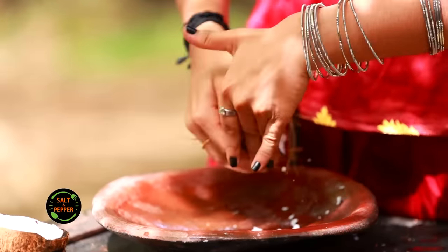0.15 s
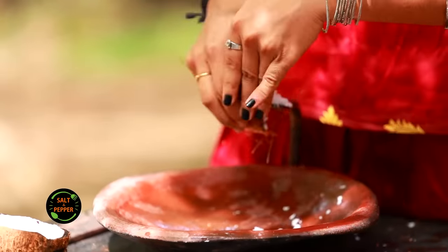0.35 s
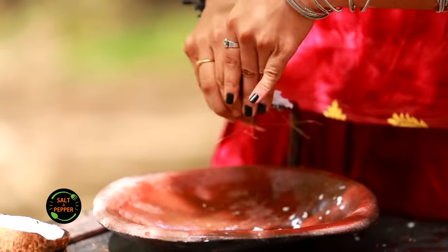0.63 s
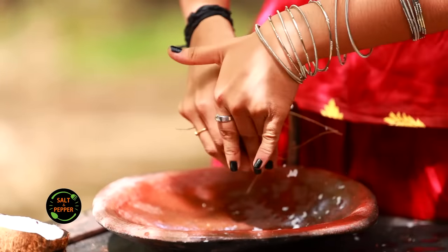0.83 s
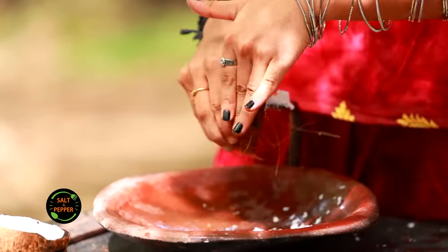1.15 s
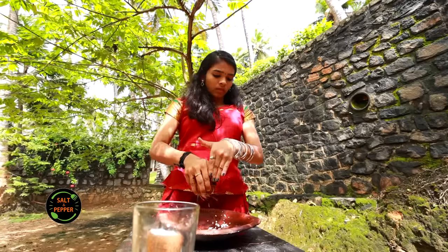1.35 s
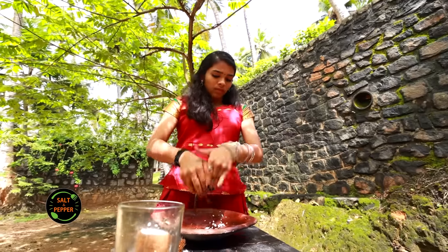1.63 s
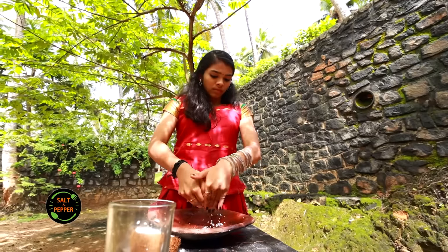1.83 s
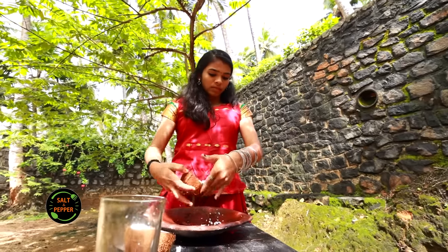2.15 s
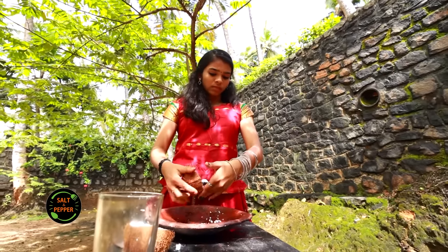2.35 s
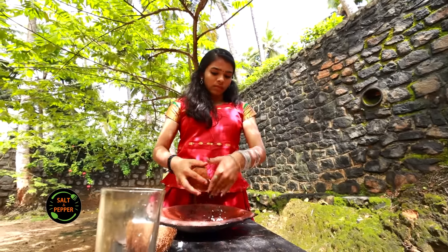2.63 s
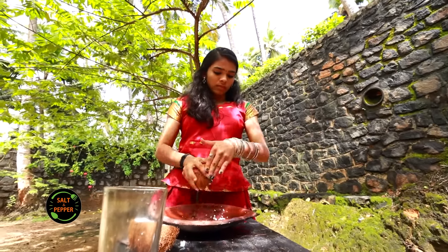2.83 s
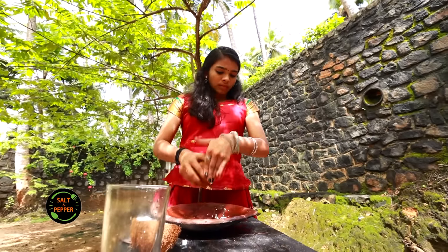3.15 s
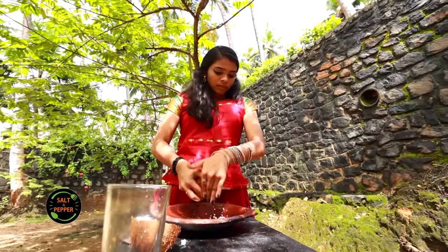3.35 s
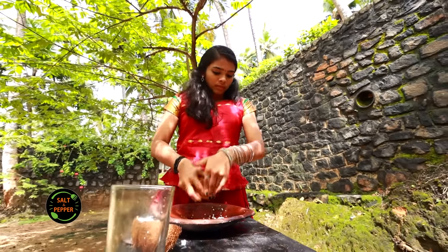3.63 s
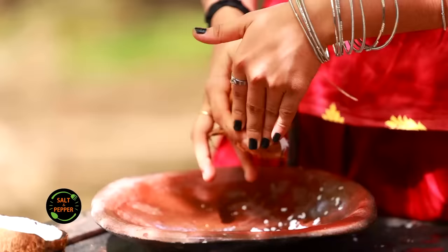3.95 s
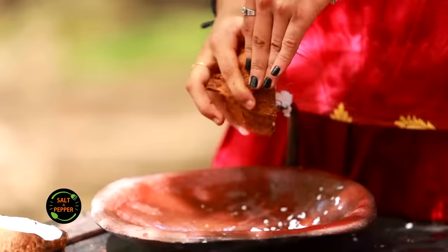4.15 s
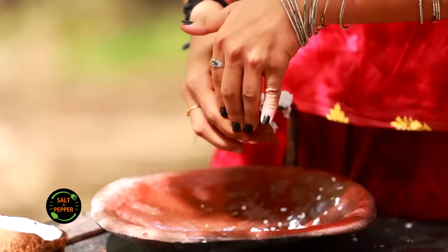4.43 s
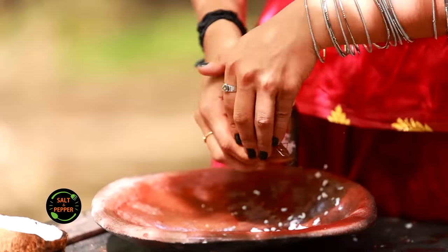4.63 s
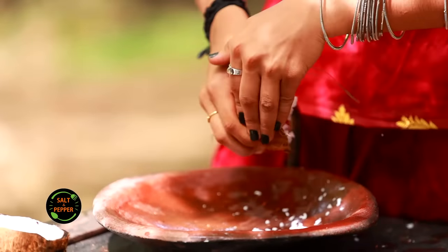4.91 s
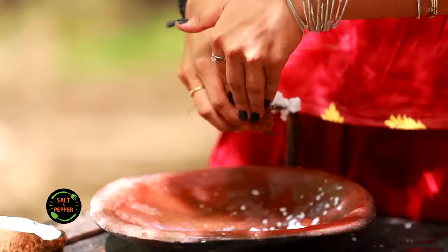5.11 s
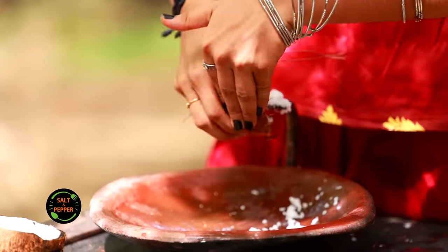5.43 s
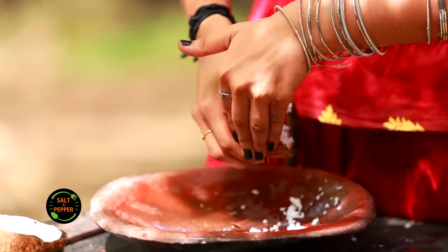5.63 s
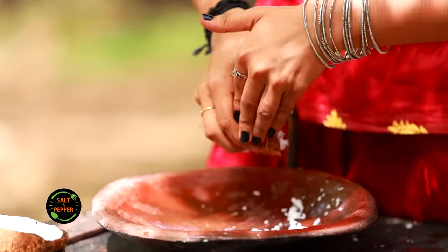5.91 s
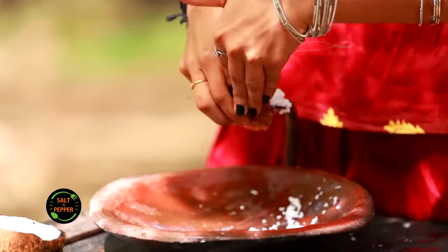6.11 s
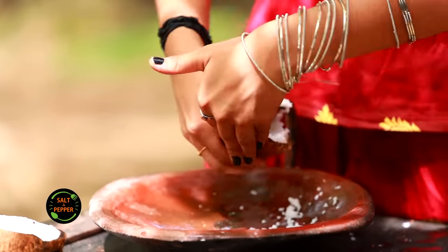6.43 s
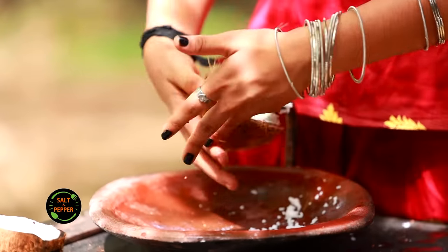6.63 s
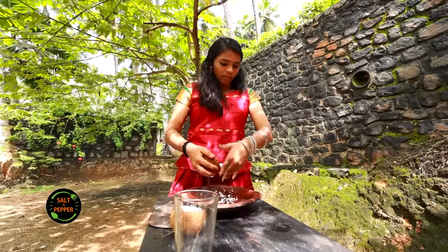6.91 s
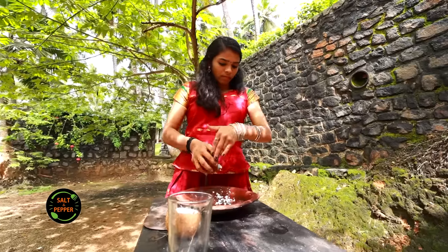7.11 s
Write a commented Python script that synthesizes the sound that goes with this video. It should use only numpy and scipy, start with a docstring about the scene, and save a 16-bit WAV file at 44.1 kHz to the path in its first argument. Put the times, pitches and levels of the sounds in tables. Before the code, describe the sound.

At an outdoor table near the microphone, a coconut half scrapes over a metal grater about three times a second, each stroke a short, hollow rasp. Thin bangles clink on the moving wrist and husk fibres crackle. The scraping stops briefly, resumes for a longer run with a brighter metallic edge, and ends with one knock of the shell. Behind it are a quiet low hum and, in the first half, a few faint distant whistles.

```python
"""Half a coconut is grated on a toothed blade at an outdoor table, over a low hum.
From the start, dry husk crackles under the fingers, thin metal bangles clink on the working wrist,
and faint whistles fade far off. Six strokes come about a third of a second apart: the teeth stick and
slip, which rasps the flesh, rings the hollow shell and thumps the table. After a pause of about a second
come ten more strokes. Near the end the shell is set down on the blade with a knock."""
import sys
import numpy as np
from scipy import signal
from scipy.fft import rfft, irfft
from scipy.io import wavfile

SR = 44100
rng = np.random.default_rng(int(sys.argv[2]) if len(sys.argv) > 2 else 0)


def file_out(sig):
    """Save sig as 16-bit WAV at sys.argv[1]."""
    # one column per channel
    cols = np.atleast_2d(sig).T
    # limit, then scale
    lim = np.clip(cols, -1, 1)
    pcm = np.round(lim * 32767).astype(np.int16)
    wavfile.write(sys.argv[1], SR, pcm)


N = 320166
TIME = np.arange(N) / SR
TOP_HZ = 15800


def undb(db):
    """Turn decibels into a gain."""
    return 10 ** (np.asarray(db) / 20)


def unit(x):
    """Scale a sound to an average (rms) level of 1."""
    return x / np.sqrt(np.mean(x ** 2) + 1e-18)


def curve(points, at=TIME):
    """Join (time_s, value) points with straight lines."""
    return np.interp(at, *np.transpose(points))


def add(out, start_s, x):
    """Mix x into out from start_s on."""
    i = max(int(start_s * SR), 0)
    out[i:i + len(x)] += x[:max(N - i, 0)]


def colour(x, points):
    """Shape the bass and treble with a curve through (pitch_hz, level_db) points."""
    hz, db = np.transpose(points)
    freqs = np.fft.rfftfreq(len(x), 1 / SR) + 1
    return irfft(rfft(x) * undb(np.interp(np.log(freqs), np.log(hz), db)), len(x))


def resonate(x, tones):
    """Let x ring (pitch_hz, width_hz, level_db) tones; neighbours swing opposite ways."""
    out = 0
    for k, (hz, width, db) in enumerate(tones):
        b, a = signal.iirpeak(min(hz, TOP_HZ), hz / min(width, TOP_HZ), fs=SR)
        out = out + (-1) ** k * undb(db) * signal.lfilter(b, a, x)
    return out


def slips(n, per_s, spread_db):
    """Tiny jolts of uneven size at random moments, as a surface sticks and slips."""
    jolts = (rng.random(n) < per_s / SR) * rng.choice([-1, 1], n)
    return unit(jolts * undb(spread_db * np.minimum(rng.standard_normal(n), 2)))


def drift(per_s):
    """A random wander, roughly between -1 and 1."""
    points = rng.standard_normal(int(N / SR * per_s) + 2)
    return np.interp(TIME * per_s, np.arange(len(points)), points)


def swell(t, half_width_s, rise=0.66):
    """Pressure that builds, peaks at t = 0 and lets go."""
    return 1 / np.cosh(np.clip(t / half_width_s / np.where(t < 0, rise, 1), -20, 20))


def match_energy(x, force, db):
    """Give x the energy of a force that peaks at db."""
    return unit(x) * np.sqrt(np.mean(force ** 2)) * undb(db)


def effort(pushes):
    """The push of the arm as a gain, from swells of (peak_s, half_width_s, level_db)."""
    out = np.zeros(N)
    t = np.arange(2 ** 14) / SR - .15
    for s, width, db in pushes:
        add(out, s + t[0], (undb(db) * swell(t, width)) ** 2)
    return np.sqrt(out)


# the tone of the outdoor air: pitch_hz, level_db
AIR_COLOUR = [(15, -47), (25, -17), (135, 1), (186, -3.5), (286, -10.5), (335, -9.5), (462, -20),
              (749, -11.5), (903, -14.5), (1000, -18.5), (2070, -33), (5720, -27.5), (9520, -39),
              (11800, -62), (15000, -39)]
# the slow swell of the hum: time_s, boost_db
HUM_SWELL = [(0, 8), (2.5, 7), (6.7, 6.5), (7.05, 8), (7.25, 9)]
def outdoor_hum(base_db=-59.5, side_db=-13, sway_db=1):
    """A low outdoor hum, nearly the same left and right."""
    middle, side = (unit(colour(rng.standard_normal(N), AIR_COLOUR)) for _ in range(2))
    gain = undb(base_db + curve(HUM_SWELL) + sway_db * drift(9.5))
    return gain * (middle + undb(side_db) * side * np.array([[1], [-1]]))


# far-off whistles: start_s, first_pitch_hz, last_pitch_hz, glide_s, blur_hz, level_db
FAR_WHISTLES = [(0, 2760, 2770, 0.33, 90, -59), (1.24, 4700, 3970, 0.31, 120, -51.5),
                (1.59, 3160, 2610, 1.1, 70.8, -56.5)]
def whistles(attack_s=0.014, fade_db_per_s=26):
    """Thin tones blurred by distance: the first is almost steady, the other two fall."""
    out = 0
    for s, first_hz, last_hz, glide_s, blur_hz, db in FAR_WHISTLES:
        t = np.maximum(TIME - s, 0)
        pitch_hz = last_hz + (first_hz - last_hz) * np.exp(-t / glide_s)
        phase = 2 * np.pi * np.cumsum(pitch_hz) / SR
        smooth = signal.butter(2, blur_hz, fs=SR, output="sos")
        blur = unit(signal.sosfilt(smooth, rng.standard_normal((2, N))))
        gain = np.minimum(t / attack_s, 1) * undb(db - fade_db_per_s * t)
        out = out + (blur[0] * np.sin(phase) + blur[1] * np.cos(phase)) * gain
    return out


# how hard the hands rub the husk between strokes: time_s, level_db
HAND_RUB = [(0, -51), (.6, -45.5), (1.22, -50.5), (1.42, -60), (1.65, -47.5), (2.0, -54.5), (2.45, -65),
            (2.8, -57), (2.94, -66), (3.08, -46.5), (3.75, -46), (4.12, -69), (4.22, -53.5), (4.85, -50),
            (6.5, -49), (6.92, -68.5), (7.16, -62), (7.25, -51)]
def rubbing(grip_db=-39, lead_s=0.019, grip_s=.01, push_db=-18, linger_s=0.013):
    """The crackle's level in dB: the hands shift, grip as a stroke begins, then press through it."""
    grips = [(s - lead_s, grip_s, grip_db) for s, *_ in GRATING_STROKES]
    pushes = [(s, width + linger_s, rasp + push_db) for s, width, _, _, rasp, _ in bites()]
    return 20 * np.log10(np.hypot(undb(curve(HAND_RUB)), effort(grips + pushes)))


# the tone of dry fibres: pitch_hz, level_db
HUSK_COLOUR = [(1200, -35), (2500, -21.5), (4200, -5), (6500, -2), (10000, 1.5), (12500, -1), (14000, -8.5),
               (16000, -23)]
# fibres that snap: start_s, level_db, pitch_hz
FIBRE_SNAPS = [(0.1788, -12, 4500), (0.4589, -28, 5520), (3.3402, -27.5, 3800), (3.551, -22, 8290),
               (4.1597, -37, 4130), (4.3803, -17, 3470), (4.635, -28, 3700), (5.179, -20.5, 8800),
               (5.292, -25, 6410), (5.9503, -19.5, 5270), (6.0612, -21.5, 3600), (6.7604, -25.5, 9350),
               (6.7934, -29, 7800)]
def husk(rub_db, crackle_db=1, flicker_db=4.0, snap_db=-5, snap_cycles=13, snap_width=0.44):
    """Dry fibres crackle under the fingers and a few snap: the thinner, the higher and shorter."""
    crackle = unit(colour(slips(N, per_s=3500, spread_db=3.5), HUSK_COLOUR))
    out = crackle * undb(rub_db + crackle_db + flicker_db * drift(70))
    t = np.arange(2 ** 11) / SR
    for s, db, hz in FIBRE_SNAPS:
        force = np.exp(-t * hz / snap_cycles)
        band = [(hz, hz * snap_width, 0)]
        snap = resonate(resonate(force * rng.standard_normal(len(t)), band), band)
        add(out, s, match_energy(snap, force, db + snap_db))
    return out


def fibre_flicks(rub_db, boost_db=5, scatter_db=4, cycles=7, low_hz=4500, high_hz=13000, count=900):
    """Single fibres flick past fingers and teeth, each with a brief pitch of its own."""
    out = np.zeros(N)
    t = np.arange(2 ** 9) / SR
    for (when, height), size in zip(rng.random((count, 2)), np.minimum(rng.standard_normal(count), 2)):
        hz = low_hz * (high_hz / low_hz) ** height
        flick = np.sin(2 * np.pi * hz * t) * np.exp(-t * hz / cycles)
        add(out, when * TIME[-1], undb(rub_db[int(when * N)] + boost_db + scatter_db * size) * flick)
    return colour(out, HUSK_COLOUR)


# how hard the moving wrist shakes the bangles: time_s, level_db
WRIST_SHAKE = [(0, -46), (.1, -55), (.6, -46), (1.3, -44), (1.5, -49.5), (2.05, -42), (2.25, -58.5),
               (3.0, -68), (3.5, -43), (3.85, -41.5), (4.12, -61), (4.3, -42), (4.75, -36.5), (5.2, -54),
               (5.8, -38.5), (6.6, -44.5), (6.72, -66), (7.26, -82)]
def shaking(push_db=-10, lag_s=0.0031, linger_s=0.013):
    """The rattle's level in dB: the wrist keeps moving, and each bite jolts it."""
    jolts = [(s + lag_s, width + linger_s, rasp + push_db) for s, width, _, _, rasp, _ in bites()]
    return 20 * np.log10(np.hypot(undb(curve(WRIST_SHAKE)), effort(jolts)))


# clear clinks as the bangles fall back: start_s, level_db, low_tones_db
BANGLE_CLINKS = [(0.3285, -32, -2), (0.46, -32.5, -2), (0.5074, -28, 1), (0.6205, -36, -5),
                 (0.6586, -31, -6.5), (0.953, -33, -1.5), (1.072, -38, -16), (1.2173, -26, -5.5),
                 (1.327, -31.5, -14), (1.6837, -35.5, -22), (1.7727, -38, -8), (1.8215, -33, 3),
                 (1.9969, -34, -5.5), (2.0452, -30, 0.5), (2.0764, -33, -12), (3.2136, -33, 3),
                 (3.273, -40, 1), (3.549, -33, 2), (3.588, -30.5, 0), (3.6691, -36, -1), (3.761, -31.5, -7),
                 (3.86, -35.5, -5), (4.51, -32.5, -3.5), (4.546, -30, -11), (4.667, -30, -18),
                 (4.8804, -33.5, 0.5), (5.1758, -31, 1), (5.464, -32.5, -3), (5.5054, -33.5, 1.5),
                 (5.5717, -36, -1), (5.682, -34, -1), (6.019, -32, -7), (6.1778, -31, -2), (6.564, -32, -4),
                 (6.5874, -30.5, -4)]
def bangle_hits(bounce_s=.007, bounce_db=-4, clink_db=-6, rattle_db=-12, rattle_low_db=-1,
                scatter_db=4, rest_db=-58, count=900):
    """Bouncing clinks and a loose rattle, as rows of (start_s, level_db, low_tones_db)."""
    hits = []
    for s, db, low in BANGLE_CLINKS:
        delays = np.cumsum(bounce_s * (.5 + rng.random(3))) * np.sqrt(np.arange(3))
        hits += [(s + delay, db + clink_db + k * bounce_db, low) for k, delay in enumerate(delays)]
    times = (np.arange(count) + rng.random(count)) / count * TIME[-1]
    shake_db = np.interp(times, TIME, shaking())
    stuck_db = np.minimum(shake_db - rest_db, 0) / 2  # under a gentle shake most bangles stay put
    levels = shake_db + stuck_db + rattle_db + scatter_db * rng.standard_normal(count)
    return hits + [(s, db, rattle_low_db) for s, db in zip(times, levels)]


# the tones of bending bangles, which vary a little in size: pitch_hz, spread_hz, level_db
BANGLE_TONES = [(5103, 110, -7), (7800, 102, -3), (8220, 133, 1.5), (11520, 84.5, 0), (12040, 190, -5),
                (15300, 190, -8)]
def bangles(ring_s=0.15, tick_db=-3, tick_s=0.0012, place_db=4, count=12):
    """A dozen thin bangles, damped by the skin; each hit ticks and sets a few of them ringing."""
    s, db, low_db = np.transpose(bangle_hits())
    at = np.clip((s * SR).astype(int), 0, N - 1)
    decay = np.exp(-np.log(1000) / (ring_s * SR))  # 60 dB quieter after ring_s
    out = np.zeros(N)
    for centre, spread, tone_db in BANGLE_TONES:
        size = undb(db + tone_db + low_db * (centre < 10000)) / np.sqrt(count)
        # where a bangle is struck favours some tones
        size *= undb(place_db * np.clip(rng.standard_normal(len(at)) - .4, -2, 1.3))
        rank = (np.arange(count) + .1 + .8 * rng.random(count)) / count
        for hz in centre + spread / 2 * np.log(rank / (1 - rank)):
            touched = rng.random(len(at)) < 1 / 3
            blows = np.bincount(at, size * touched * rng.choice([-2, 2], len(at)), N)
            angle = 2 * np.pi * hz / SR
            feedback = [1, -2 * decay * np.cos(angle), decay ** 2]
            out += signal.lfilter([0, np.sin(angle)], feedback, blows + 1e-18)
    taps = np.bincount(at, undb(db + tick_db), N)
    ticks = signal.lfilter([1], [1, -np.exp(-1 / (tick_s * SR))], taps + 1e-18)
    return out + colour(2 * ticks * rng.standard_normal(N), HUSK_COLOUR)


# strokes over the blade: bite_s, half_width_s, ring_db, tilt_db_per_octave, rasp_db, catch_after_s,
# catch_half_width_s, catch_vs_bite_db, skip_vs_catch_db, thump_after_s, thump_db
GRATING_STROKES = [(0.191, 0.0039, -13.5, -1, -25, 0.076, 0.019, -15, -35, 0.096, -37),
                   (0.509, 0.015, -19, 5, -28.5, 0.038, 0.0076, -2.5, -20.5, 0.049, -36),
                   (0.811, 0.015, -19, 2, -29.5, 0.04, 0.013, -8, -19, 0.032, -28),
                   (1.169, 0.0047, -12.5, -6, -25, 0.021, 0.016, -22, -17, .02, -53),
                   (1.558, 0.011, -24.5, 0, -29, 0.026, .012, 0.5, -20, .032, -36),
                   (1.865, 0.014, -20, 2, -28.5, .025, 0.0075, -6.5, -13, .022, -24.5),
                   (3.07, 0.019, -25, 0.5, -35.5, .051, 0.016, 0.5, -15.5, 0.061, -37.5),
                   (3.369, 0.006, -17.5, -0.5, -30, .04, 0.031, -7, -4, 0.025, -26),
                   (3.696, 0.011, -18.5, 1, -31, 0.048, 0.011, -1, -16.5, 0.04, -29.5),
                   (4.352, 0.0093, -24.5, 7, -33, 0.056, 0.014, 2, -3.5, 0.014, -32.5),
                   (4.683, 0.013, -14, 4, -23.5, 0.074, 0.016, -15.5, -40, 0.0124, -36),
                   (5.004, 0.015, -20, 6.5, -27.5, .056, 0.0091, -0.5, -6.5, 0.053, -36),
                   (5.339, 0.013, -17.5, 3.5, -28, 0.056, .008, -2.5, -7.5, 0.026, -32.5),
                   (5.669, 0.008, -16, 1.5, -27.5, 0.067, 0.013, -5.5, -14, 0.075, -36),
                   (6.0, 0.0097, -20, 1, -29.5, 0.077, 0.011, -5, -14, 0.11, -38.5),
                   (6.329, 0.007, -19.5, 5, -30, 0.083, 0.0086, -4, -15, 0.018, -38)]
# light brushes of shell and hands between strokes: peak_s, ring_db, rasp_db, thump_db
LIGHT_BRUSHES = [(0.715, -34.5, -43, -47), (1.037, -37, -45.5, -46), (1.764, -46, -53, -69),
                 (2.35, -58, -70, -51), (2.852, -63, -49.5, -66), (2.96, -69, -47.5, -57),
                 (4.217, -45.5, -46.5, -57), (4.58, -47, -58, -60), (5.564, -51, -61, -43.5),
                 (6.235, -43.5, -60, -54)]
def bites(brush_s=0.0098, brush_tilt=-3, dulling=-3.5, rasp_share=0.89, load_db=-28):
    """Every contact, as (peak_s, half_width_s, ring_db, tilt_db_per_octave, rasp_db, thump_db)."""
    rows = [(s, brush_s, ring, brush_tilt, rasp, thump) for s, ring, rasp, thump in LIGHT_BRUSHES]
    for s, width, ring, tilt, rasp, after, catch_width, catch_db, skip_db, _, _ in GRATING_STROKES:
        touch_db = -10 + 10.5 * np.log2(width / 0.015)  # a slower bite comes with a firmer touch
        dull = tilt + dulling  # buried teeth give a duller ring
        steps = [(s - .032, 0.0022, touch_db, tilt),  # the shell touches the teeth
                 (s, width, 0, tilt),  # they bite
                 (s + .019, 0.0075, -11, dull),  # drag on
                 (s + after, catch_width, catch_db, dull),  # catch again
                 (s + after + .042, 0.011, catch_db + skip_db, dull)]  # the shell skips off
        for at, span, db, slope in steps:
            rows.append((at, span, ring + db, slope, rasp + rasp_share * db, ring + db + load_db))
    return rows


# the tones of the hollow shell: pitch_hz, width_hz, level_db
SHELL_TONES = [(475, 35, -15), (650, 33.4, -6.5), (749, 51, -8), (816.4, 45.5, -0.5), (965, 33, -7),
               (1051, 36.7, -7)]
def shell_tones(tilt, shift=0.016, scatter_db=2):
    """The shell's tones vary with each grip and point of contact; more tilt makes them brighter."""
    return [(hz * (1 + shift * rng.standard_normal()), width,
             db + tilt * np.log2(hz / SHELL_TONES[0][0]) + scatter_db * rng.standard_normal())
            for hz, width, db in SHELL_TONES]


def flake_tones(low_hz=1400, high_hz=6500, width_hz=150, db=-1, count=7):
    """Flakes that break off ring briefly, at new pitches in every bite."""
    return [(low_hz * (high_hz / low_hz) ** height, width_hz, db) for height in rng.random(count)]


# the tones of the blade and of its toothed rim: pitch_hz, width_hz, level_db
BLADE_TONES = [(1434, 91, 0.5), (1850, 53, 12), (2056, 71, -2.5), (2440, 27, -49), (5400, 30, -13),
               (6590, 100, 5)]
RIM_TONES = [(3200, 17, -19), (3338, 117, 8.5), (3476, 200, -3), (3724, 34, 8.5)]
# how freely the rim sings as the teeth dig deeper: time_s, boost_db
RIM_BOOST = [(0, 1), (3.8, 8.5), (4.4, 13), (5.4, 10.5), (6.5, 12)]
# the tone of tearing flesh: pitch_hz, level_db
FLESH_COLOUR = [(250, -10), (450, 15), (1200, -25), (1700, 5.5), (2500, 2.5), (3400, 11), (4600, 4),
                (7000, 0), (11000, -3), (16000, -34)]
def grating(blade_db=3, ring_lead_s=0.0068, rasp_lead_s=0.0064, thump_lag_s=0.0089, rasp_stretch=1.304):
    """In each bite the flesh tears, shell and blade ring, then the table takes the load."""
    out = np.zeros(N)
    t = np.arange(2 ** 13) / SR - .08
    for s, width, ring_db, tilt, rasp_db, thump_db in bites():
        force = swell(t + ring_lead_s, width)
        jolts = colour(force * slips(len(t), per_s=1500, spread_db=4.5), [(1050, 8.5), (1300, -0.5)])
        shell = match_energy(resonate(jolts, shell_tones(tilt)), force, ring_db)
        tear = swell(t + rasp_lead_s, width * rasp_stretch)
        teeth = tear * slips(len(t), per_s=2400, spread_db=3)
        blade = undb(blade_db) * resonate(teeth, BLADE_TONES)
        rim = undb(curve(RIM_BOOST, s)) * resonate(teeth, RIM_TONES)
        flesh = colour(teeth, FLESH_COLOUR) + resonate(teeth, flake_tones())
        rasp = match_energy(flesh + blade + rim, tear, rasp_db)
        thump = table_shudder(swell(t - thump_lag_s, width), thump_db)
        add(out, s + t[0], shell + rasp + thump)
    return out


# the low tones of the table: pitch_hz, width_hz, level_db
TABLE_TONES = [(171, 24.8, 4.5), (241, 154, -11), (337, 94, -11.5)]
def table_shudder(load, db):
    """The table shudders as a load presses on it."""
    jolts = load * slips(len(load), per_s=1200, spread_db=11.5)
    dull = colour(jolts, [(60, -14.5), (150, -12), (400, 1), (900, -21)])
    return match_energy(resonate(dull, TABLE_TONES), load, db)


def arm_thumps(half_width_s=.012, lead_s=0.0035):
    """Once in each stroke the weight of the arms comes down on the table."""
    out = np.zeros(N)
    t = np.arange(2 ** 13) / SR - .08
    for s, *_, after, db in GRATING_STROKES:
        add(out, s + after + t[0], table_shudder(swell(t + lead_s, half_width_s), db))
    return out


# the shell set down on the blade: start_s, level_db
SHELL_KNOCK = [(6.551, -26)]
def knock(contact_s=0.0094, blade_db=-8, crack_db=-8, dull_hz=1500, boost_db=4):
    """A short, rough contact makes a crack and rings shell and blade together."""
    out = np.zeros(N)
    t = np.arange(2 ** 13) / SR
    damped = [(hz, 2 * width, db) for hz, width, db in BLADE_TONES]  # the resting shell damps the blade
    for s, db in SHELL_KNOCK:
        force = np.exp(-t / contact_s)
        push = force * rng.standard_normal(len(t))
        dull = signal.lfilter(*signal.butter(1, dull_hz, fs=SR), push)
        shell = unit(resonate(push, shell_tones(tilt=8.8)))
        blade = undb(blade_db) * unit(resonate(dull, damped))
        crack = undb(crack_db) * unit(resonate(dull, [(1620, 3300, 0)]))
        add(out, s, match_energy(shell + blade + crack, force, db + boost_db))
    return out


def yard_echo(x, echo_db=-24, side_db=-30, side_hz=2500, fade_s=0.4):
    """A weak echo from the stone wall and the ground; its duller part differs left and right."""
    t = np.arange(SR // 2) / SR
    tails = rng.standard_normal((2, len(t))) * np.exp(-np.log(1000) * t / fade_s) * (t > .008)
    middle, side = (signal.fftconvolve(x, tail / np.linalg.norm(tail))[:N] for tail in tails)
    side = signal.lfilter(*signal.butter(1, side_hz, fs=SR), side)
    return x + undb(echo_db) * middle + undb(side_db) * side * np.array([[1], [-1]])


def scene():
    """The work sits straight ahead, with the whistles and the hum behind it."""
    rub_db = rubbing()
    work = grating() + arm_thumps() + knock() + bangles() + husk(rub_db) + fibre_flicks(rub_db)
    return yard_echo(work) + whistles() + outdoor_hum()


def record(dry, bass_hz=32):
    """Thin out the lowest bass and cut the highest treble."""
    thin = signal.sosfilt(signal.butter(2, bass_hz, "high", fs=SR, output="sos"), dry)
    return signal.sosfilt(signal.ellip(10, .2, 80, TOP_HZ, fs=SR, output="sos"), thin)


dry = scene()
out = record(dry)
file_out(out)
```